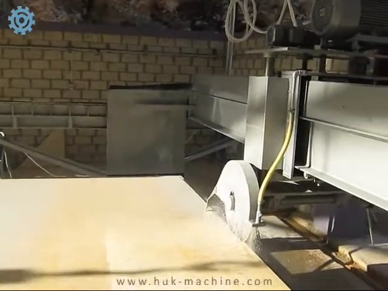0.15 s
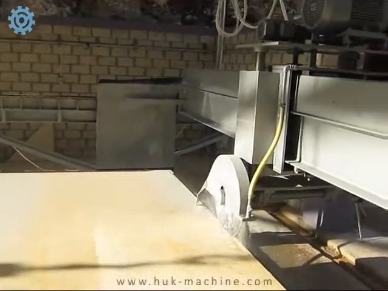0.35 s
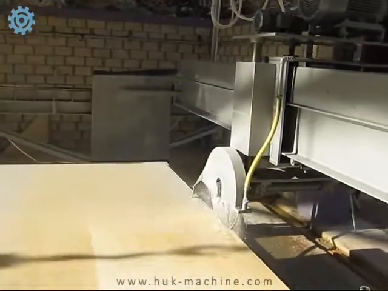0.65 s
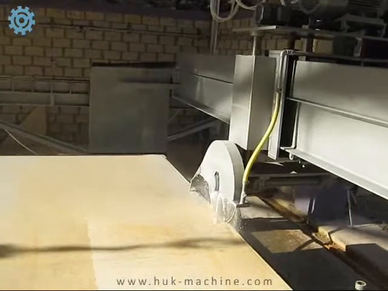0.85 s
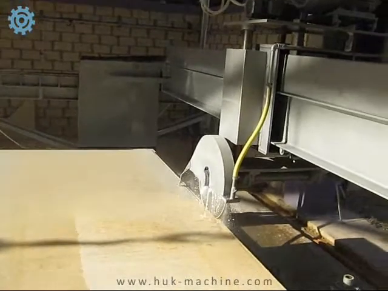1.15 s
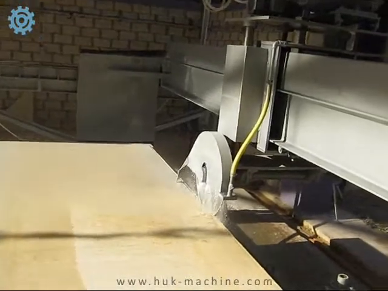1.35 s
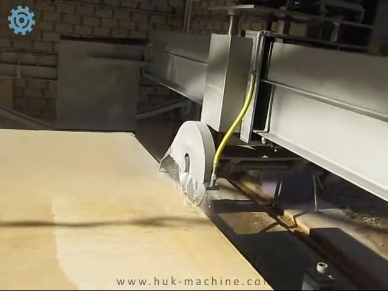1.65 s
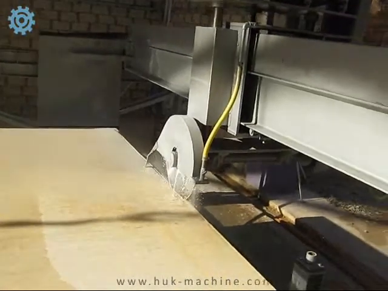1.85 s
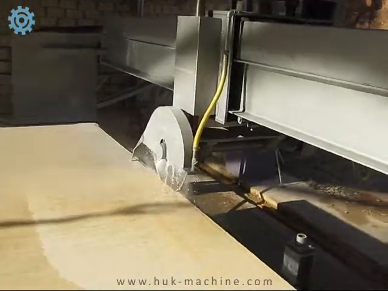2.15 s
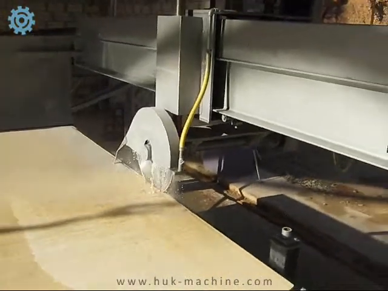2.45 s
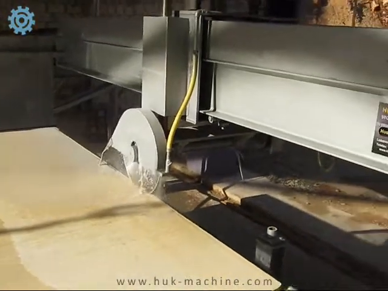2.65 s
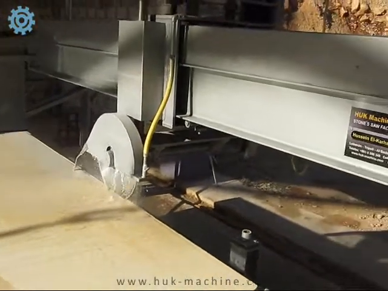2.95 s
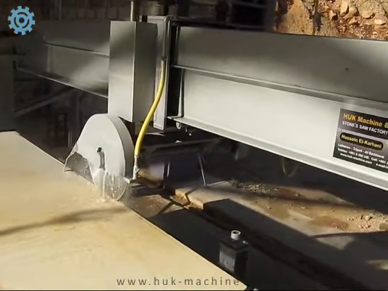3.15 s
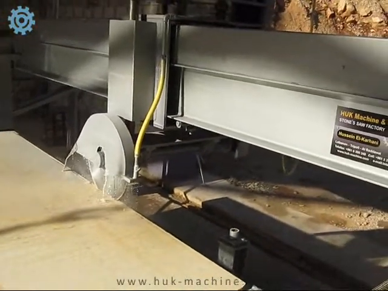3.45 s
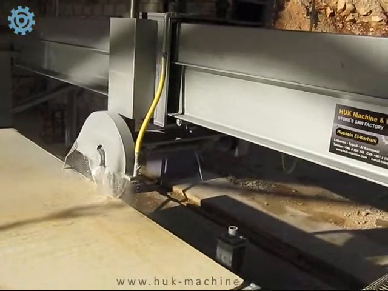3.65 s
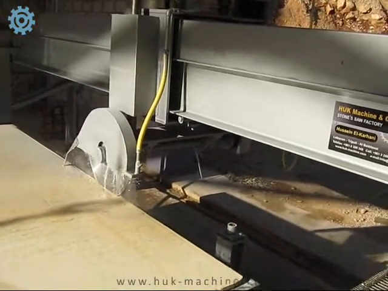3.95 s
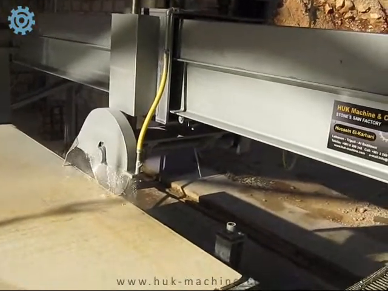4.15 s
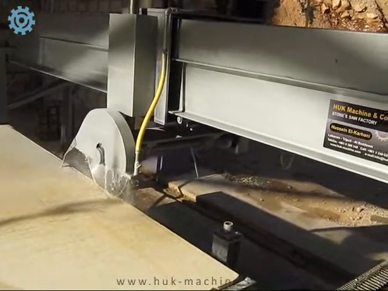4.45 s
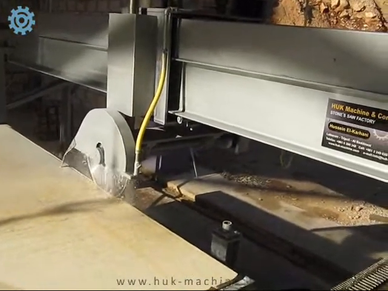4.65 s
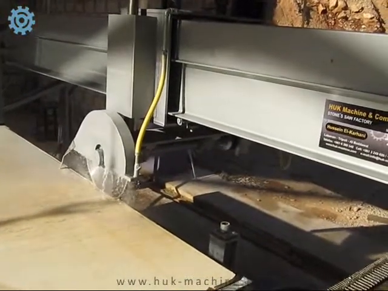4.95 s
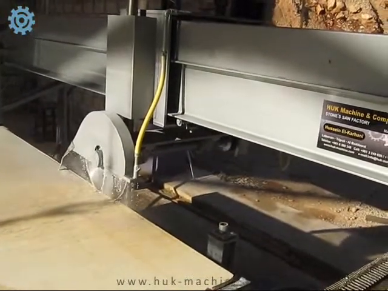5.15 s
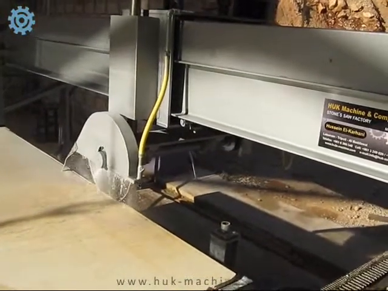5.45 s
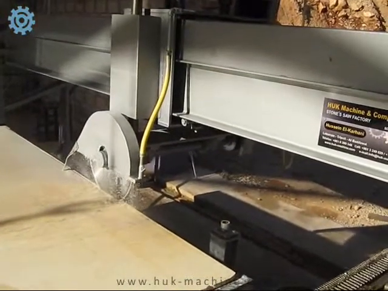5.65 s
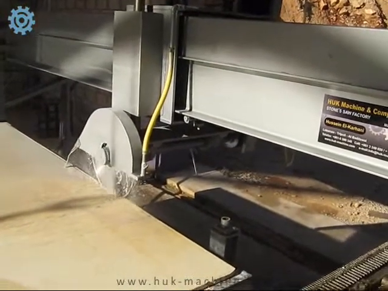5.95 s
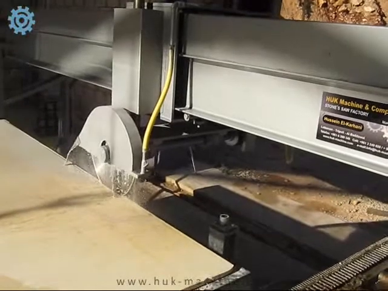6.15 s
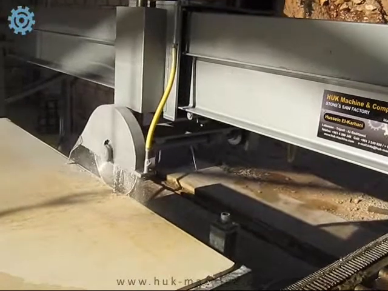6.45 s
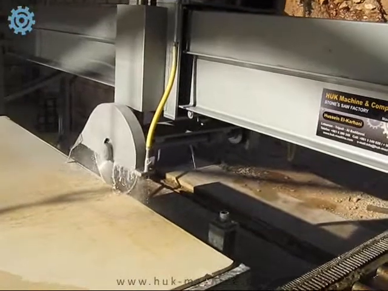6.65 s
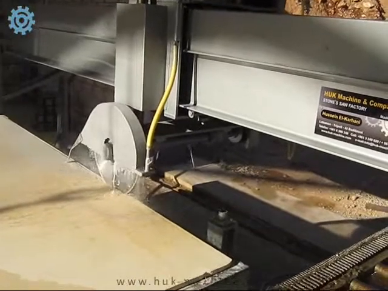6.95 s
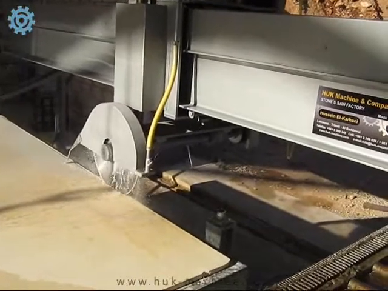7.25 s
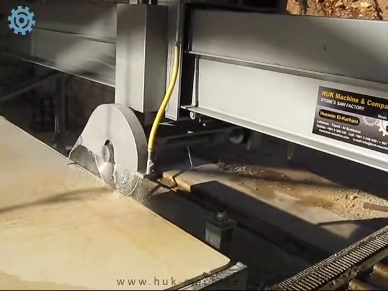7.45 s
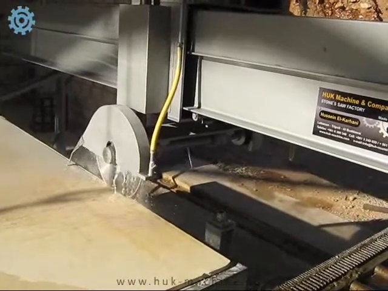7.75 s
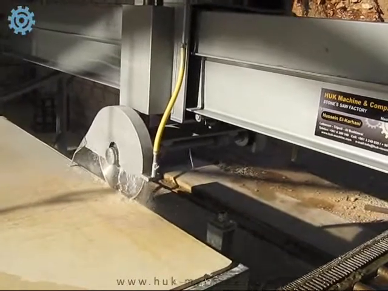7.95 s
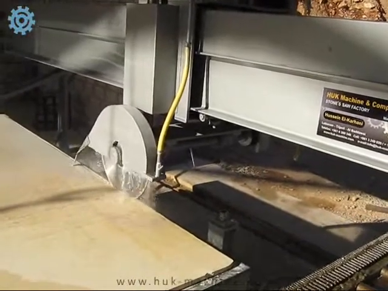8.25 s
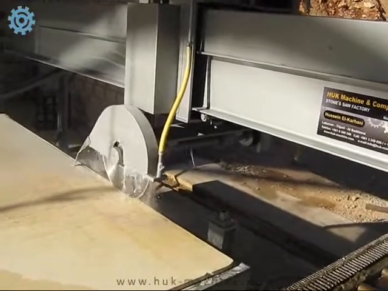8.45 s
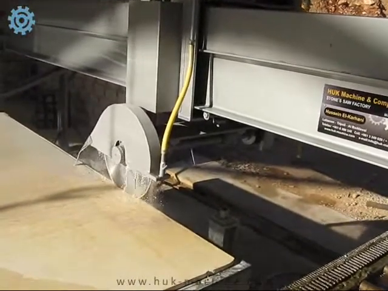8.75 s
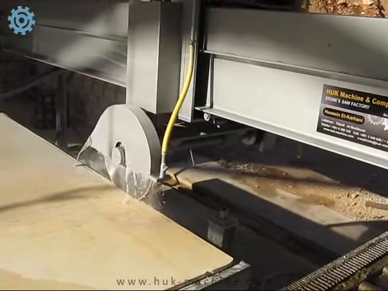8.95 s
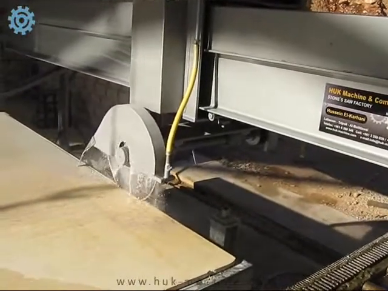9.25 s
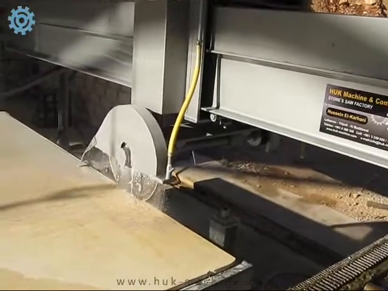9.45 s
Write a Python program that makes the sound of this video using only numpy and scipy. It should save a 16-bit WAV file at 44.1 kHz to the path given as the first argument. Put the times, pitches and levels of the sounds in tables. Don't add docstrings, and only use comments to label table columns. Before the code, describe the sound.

Loud, unbroken grinding of a spinning diamond disc in stone, with shifting shrill squeals, buzzing low tones and wet hiss, heard through a gritty microphone.

```python
import sys
import numpy as np
from scipy import signal
from scipy.fft import rfft, irfft
from scipy.io import wavfile
from scipy.ndimage import uniform_filter1d, map_coordinates

SR = 44100
rng = np.random.default_rng(int(sys.argv[2]) if len(sys.argv) > 2 else 0)


def pcm_store(signal):
    levels = np.round(np.clip(np.atleast_2d(signal), -1, 1) * 32767)
    wavfile.write(sys.argv[1], SR, levels.astype(np.int16).T)


def amplitude_ratio(level_db):
    exponent = np.asarray(level_db, float) / 20
    return 10 ** exponent


N = 422904
SHAFT_HZ = 41.756
HOLD = 4
RATE, SIZE = SR // HOLD, N // HOLD + 1
TIME = np.arange(SIZE) / RATE


def level(x, db):
    return x * amplitude_ratio(db) / np.sqrt(np.mean(x ** 2))


def curve(table):
    return np.interp(TIME, *np.transpose(table))


def walk(rate):
    steps = int(TIME[-1] * rate) + 2
    knots = TIME[::SIZE // 2000]
    smooth = map_coordinates(rng.standard_normal(steps), [knots * rate], order=2, mode="mirror")
    return level(np.interp(TIME, knots, smooth), 0)


def swells(table, low_hz, high_hz):
    lift_db = 0 * TIME
    for hz, middle, length, db in table:
        if low_hz < hz < high_hz:
            lift_db = lift_db + db * np.exp(-abs(2 * (TIME - middle) / length) ** 3)
    return level(amplitude_ratio(lift_db), 0)


def shaft_order(turns, order, loose, rate):
    share = np.clip(loose, 0, 1)
    wander = walk(rate) + 1j * walk(rate)
    sway = np.sqrt(1 - share) + np.sqrt(share / 2) * wander
    return np.real(sway * np.exp(2j * np.pi * (order * turns + rng.random())))


def blade(turns):
    # (time [s], level [dB])
    cut = [(0.0, -21), (0.21, -22), (0.37, -21), (0.77, -22), (1.42, -20.5), (1.52, -24.5), (1.57, -21.5),
           (3.1, -21.5), (3.18, -22.5), (4.0, -20), (5.23, -22), (6.01, -21), (6.03, -21.5), (6.81, -20.5),
           (7.35, -23), (7.37, -20.5), (9.59, -21.5)]
    modes_hz = [2280, 2422, 2505, 2547, 2590, 2700, 2800, 2922, 3047, 3100, 3257, 3330, 3382, 3590, 3690,
                3880, 4050, 4215, 4383, 4510, 4630, 4820, 4940, 5100, 5178, 5310, 5380, 5470]
    # (width [Hz], level [dB])
    modes = [(120, -18), (45.2, -5.5), (35, -7), (35.8, -4), (23, -11), (140, -11), (50.3, -7.5),
             (30, -11.5), (45, -10.5), (60.7, -8), (50, -9.5), (70.5, -6.5), (40, -9.5), (80, -9.5),
             (79.4, -10), (143, -14.5), (101, -9), (92, -10), (52.4, -5.5), (54.3, -10), (130, -9),
             (50, -17), (105, -5.5), (50, -9.5), (46.3, -4.5), (60, -6.5), (58, -10), (44, -13)]
    # (low edge [Hz], high edge [Hz])
    regions = [(2525, 2570), (3280, 3400), (5150, 5205), (2400, 2445), (2780, 3120), (3660, 3730),
               (4360, 4410)]
    # (frequency in a region [Hz], middle [s], length [s], lift [dB])
    squeals = [(2547, 0.3, 0.43, 9), (2547, 1.5, 1.9, 3.5), (2547, 5.4, 2.7, 4.5), (2547, 5.94, 0.25, 9.5),
               (2547, 6.48, 0.18, 5.4), (3340, 2.6, 0.57, 4.5), (3340, 4.9, 3.4, 2.5), (3340, 7.38, 0.3, 6),
               (5178, 1.85, 0.83, 6), (5178, 3.4, 0.77, 4), (5178, 9.6, 0.33, 7), (2422, 1.74, 0.68, 3.5),
               (2422, 2.66, 0.5, 3.7), (2422, 3.75, 0.53, 2), (2422, 7.6, 1.6, 3), (2422, 9.15, 1.1, 3.5),
               (2950, 5.9, 1.7, 2), (2950, 7.4, 0.52, 4), (2950, 8.35, 1.62, 2.1), (3690, 0.75, 2.5, 9.5),
               (3690, 8.3, 0.48, 10), (4383, 1.99, 0.22, 3), (4383, 7.7, 0.7, 4), (4383, 9.1, 0.42, 5)]

    rim = sum(shaft_order(turns, k, loose=0.0029 * k, rate=4.0) for k in range(52, 132))
    bite = 1 + 0.04 * np.cos(2 * np.pi * turns) + 0.077 * np.cos(2 * 2 * np.pi * turns)
    grit = bite * rng.standard_normal(SIZE)
    push = rfft(level(rim, 0) + level(grit, 2.4))
    hz = np.fft.rfftfreq(SIZE, 1 / RATE)
    region_gains = [swells(squeals, low, high) for low, high in regions]
    out = 0
    for mode_hz, (width, db) in zip(modes_hz, modes):
        resonance = 1 / (1 + (2 * (hz - mode_hz) / width) ** 2)
        ring = irfft(push * resonance, SIZE)
        gains = [g for g, (low, high) in zip(region_gains, regions) if low < mode_hz < high]
        squeal = gains[0] if gains else 1
        wet = amplitude_ratio(0.57 * walk(1.66) + 0.76 * walk(8.0))
        out = out + amplitude_ratio(db) * squeal * wet * ring
    grain_db = 0.36 * walk(9.0)
    return level(out, -1.1) * amplitude_ratio(curve(cut) + grain_db)


def frame(turns):
    # (shaft order, level [dB])
    hum = [(1, -23), (2, -16), (3, -20), (4, -15.5), (5, -19.5), (6, -1), (7, -14.5), (8, -8.5), (9, -16.5),
           (10, -7), (11, -15), (12, -9), (13, -3), (14, -10), (15, -4), (16, -4), (17, 1.5), (18, -5),
           (19, -5), (20, -6), (21, -5), (22, -8), (23, -5.5), (24, -24), (25, -11.5), (26, -7),
           (27, -11.5), (28, -12.5), (29, -10), (30, -9.5), (31, -3.5), (32, -6.5), (33, -8.5), (34, -7),
           (35, -15), (36, -5), (37, -9), (38, -11), (39, -12), (40, -9), (41, -30), (42, -20), (43, -14),
           (44, -8.5), (45, -17), (46, -34), (47, -6), (48, -38), (49, -8), (50, -22), (51, -8),
           (52, -10.5)]
    # (frequency in a group
    # [Hz], middle [s], length [s], lift [dB])
    shed = [(250, 1.23, 5.74, 19.5), (250, 4.8, 1.5, 3.5), (250, 9.7, 5.1, 12), (334, 5.1, 2.6, -10),
            (418, 2.58, 0.75, 6), (418, 4.0, 3.4, 7.4), (418, 6.33, 0.42, 5.0), (418, 7.5, 1.04, 6.5),
            (418, 9.9, 1.2, 6.2), (543, 0.35, 0.8, 8), (543, 2.64, 2.05, 8), (543, 4.6, 0.57, 7),
            (543, 6.5, 2.1, 6.5), (543, 8.86, 2.46, 12), (626, 0.3, 1.0, 4), (626, 5.15, 3.6, 13.5),
            (626, 8.97, 2.8, 15), (668, 2, 2.4, 4), (668, 4.9, 2.2, 4.5), (668, 7.2, 1.1, 6),
            (668, 9.1, 1.4, 8), (710, 1.05, 4.1, 19), (710, 3.1, 1, -10), (710, 4.7, 2.1, 14.7),
            (710, 7.0, 1.1, 11), (710, 8.75, 2.4, 20.5),
            (752, 1.9, 2.0, 8), (752, 4.0, 2.6, 5.5), (752, 8.8, 2.6, 5), (855, 2.9, 4, 9.6),
            (855, 6.93, 2.6, 8.5), (960, 3.2, 2.6, 4.5), (960, 8.55, 1.8, 6), (1065, 0.2, 2.6, 7.5),
            (1065, 3.9, 2.2, 1.5), (1065, 5.56, 0.77, 4), (1065, 9.3, 3.4, 7), (1295, 3.6, 1.9, 3.5),
            (1295, 6.5, 2.52, 4.5), (1295, 8.7, 1.59, 5), (1565, 1.0, 3.4, 7.5), (1565, 4.4, 0.9, 4),
            (1565, 6.67, 1.4, 6), (1565, 9.6, 2.8, 5.5)]
    order_groups = [(6, 6), (8, 8), (10, 10), (12, 14), (15, 15), (16, 16), (17, 17), (18, 18), (19, 22),
                    (23, 23), (24, 27), (28, 34), (35, 40)]

    group_gains = [swells(shed, (first - .5) * SHAFT_HZ, (last + .5) * SHAFT_HZ)
                   for first, last in order_groups]
    out = 0
    for order, db in hum:
        gains = [g for g, (first, last) in zip(group_gains, order_groups) if first <= order <= last]
        swell = gains[0] if gains else 1
        loose = .04 if gains and order < 24 else .18
        out = out + amplitude_ratio(db) * swell * shaft_order(turns, order, loose, rate=1.09)
    return level(out, -33.5)


def spray():
    # (frequency [Hz], density [dB per Hz])
    hiss = [(20, -23), (60, -7.5), (150, -4), (400, -2.5), (700, -2), (1000, -2.5), (1400, -0.5),
            (1800, -2), (2300, -0.5), (2600, -1), (4000, 3), (5500, 7)]

    hz = np.fft.rfftfreq(SIZE, 1 / RATE) + 1
    hiss_hz, hiss_db = np.transpose(hiss)
    colour = amplitude_ratio(np.interp(np.log(hz), np.log(hiss_hz), hiss_db))
    out = 0
    for centre in range(14):
        patch = np.sqrt(np.clip(1 - abs(np.log2(hz) - centre), 0, 1))
        flicker = amplitude_ratio(0.42 * walk(5.0))
        out = out + flicker * irfft(rfft(rng.standard_normal(SIZE)) * colour * patch, SIZE)
    return level(out, -29.5)


def pump():
    # (frequency [Hz], level [dB])
    tones = [(317, -56.5), (519, -56)]

    return sum(level(shaft_order(TIME, hz, loose=0.22, rate=1.6), db) for hz, db in tones)


def scene():
    # (time [s], extra sound path [m])
    sway_path = [(0.0, 0.0), (0.6, -0.026), (1.2, 0.08), (1.5, 0.168), (2.2, 0.13), (2.95, -0.165),
                 (3.6, -0.09), (4.05, -0.14), (4.8, -0.024), (5.5, -0.118), (6.05, 0.025), (6.75, 0.125),
                 (7.25, 0.09), (7.85, -0.168), (8.4, -0.085), (8.8, -0.06), (9.3, 0.12), (9.59, 0.0)]

    delay = uniform_filter1d(curve(sway_path), size=1500) / 343
    turns = SHAFT_HZ * (TIME - delay)
    air = blade(turns) + frame(turns) + spray() + pump()
    return signal.resample(air, HOLD * SIZE)[None, :N]


def thin_treble(x, size=4096, count=10):
    # (frequency [Hz], threshold against the usual level near 12 kHz [dB])
    threshold = [(8000, -2), (9200, 2.5), (10000, -5), (10600, -3.5), (10800, -9.5), (11250, -9.5),
                 (11700, -6), (12050, 1.5), (12500, -1.5), (12700, 30)]

    hz, _, bins = signal.stft(x, SR, nperseg=size)
    power = np.add.reduceat(abs(bins) ** 2, np.arange(0, len(hz), count))
    band_hz = hz[::count]
    usual = np.median(power[(band_hz > 11700) & (band_hz < 12500)])
    drift_db = 2.5 * uniform_filter1d(rng.standard_normal(power.shape), size=3)
    threshold_db = np.interp(band_hz, *np.transpose(threshold), left=-99)[:, None] + drift_db
    sounding = power > usual * amplitude_ratio(2 * threshold_db)
    mask = np.repeat(sounding, count, axis=0)[:len(hz)]
    return signal.istft(bins * mask, SR, nperseg=size)[1][:N]


def top_cut(x):
    return signal.sosfilt(signal.butter(12, 12800, fs=SR, output="sos"), x)


def record(dry):
    top = .3
    squeezed = top * np.tanh(1.312 * dry[0] / top) - .0011
    held = np.repeat(squeezed[::HOLD], HOLD)
    slip = 11025
    played = np.resize(signal.resample(held, N - N // slip), N)
    return top_cut(thin_treble(played))


dry = scene()
out = record(dry)
pcm_store(out)
```